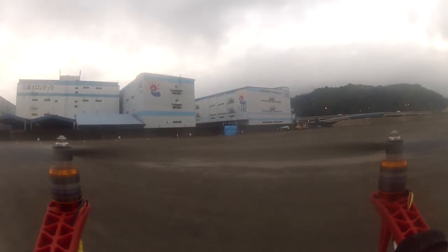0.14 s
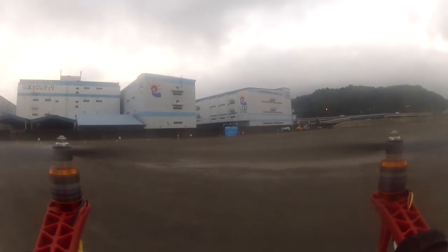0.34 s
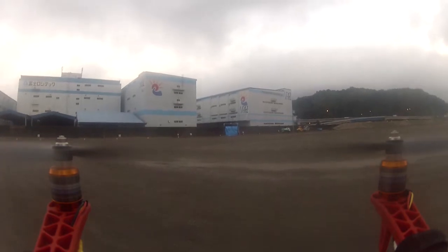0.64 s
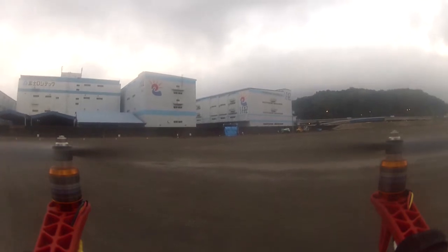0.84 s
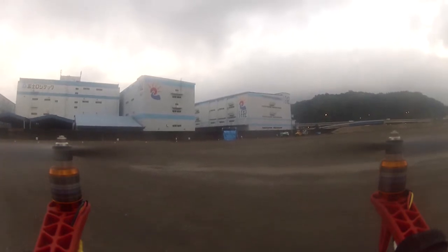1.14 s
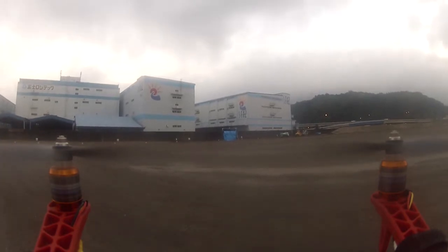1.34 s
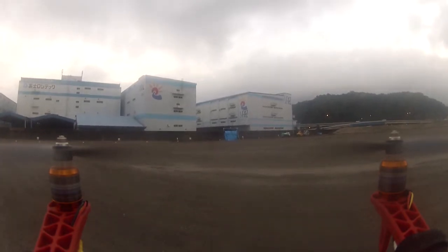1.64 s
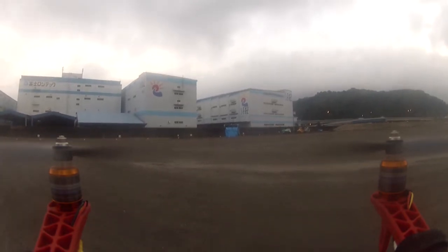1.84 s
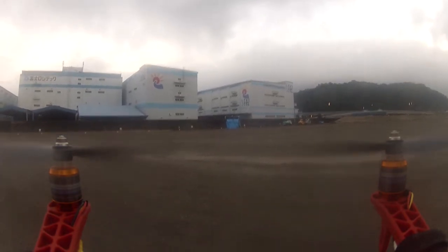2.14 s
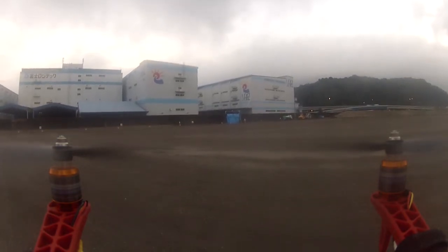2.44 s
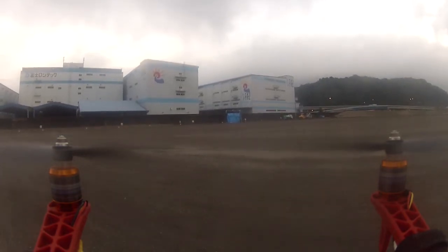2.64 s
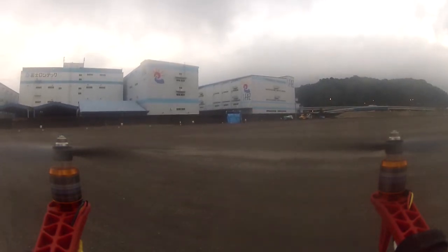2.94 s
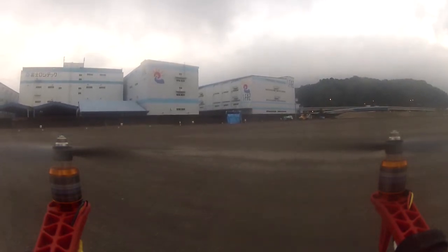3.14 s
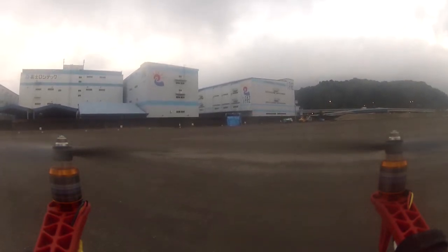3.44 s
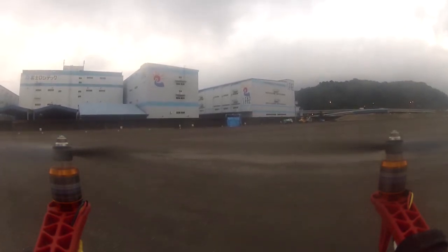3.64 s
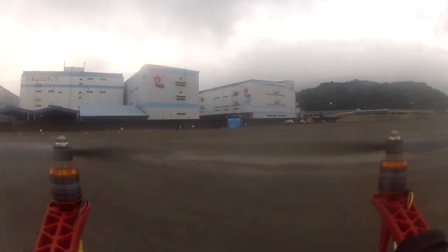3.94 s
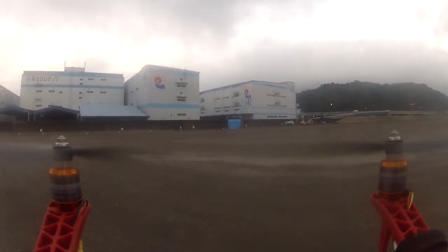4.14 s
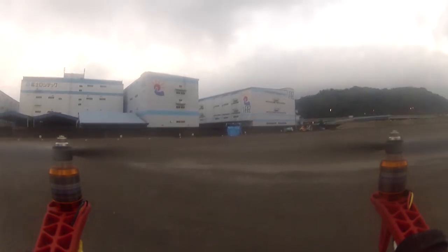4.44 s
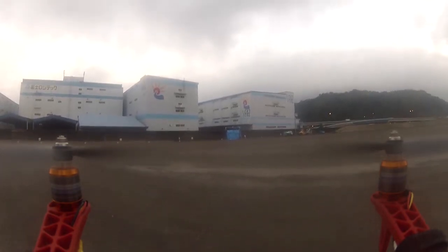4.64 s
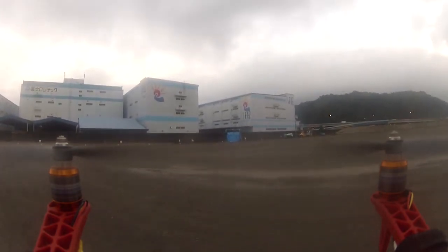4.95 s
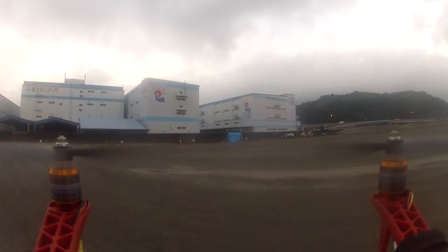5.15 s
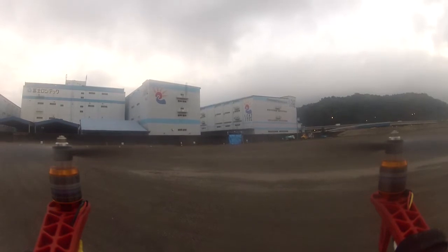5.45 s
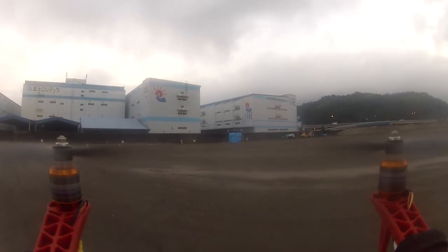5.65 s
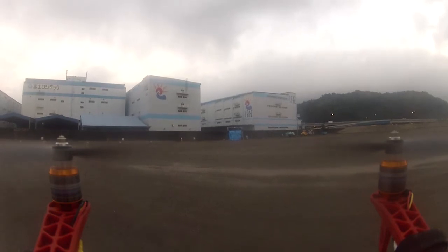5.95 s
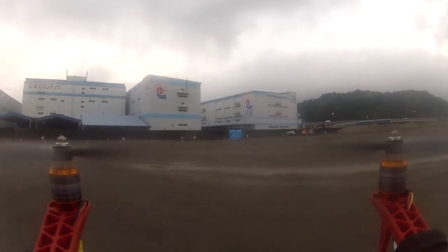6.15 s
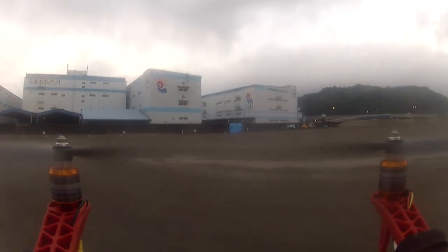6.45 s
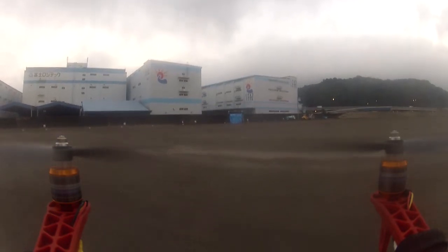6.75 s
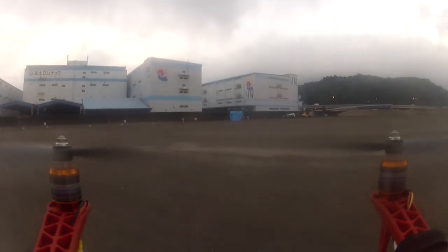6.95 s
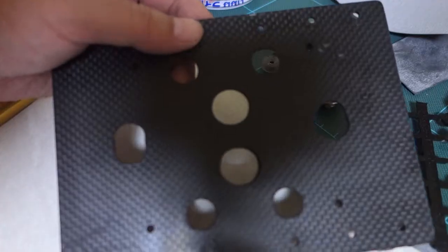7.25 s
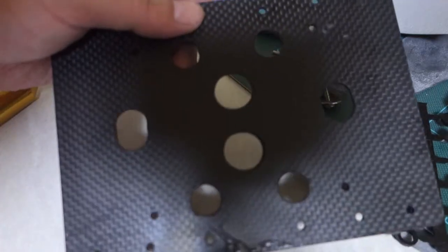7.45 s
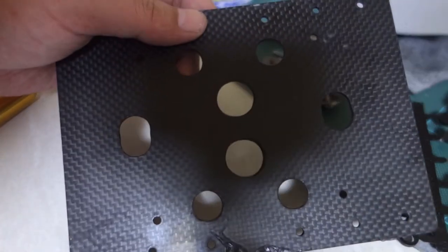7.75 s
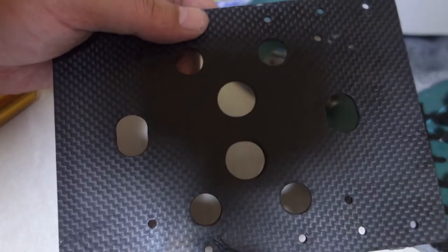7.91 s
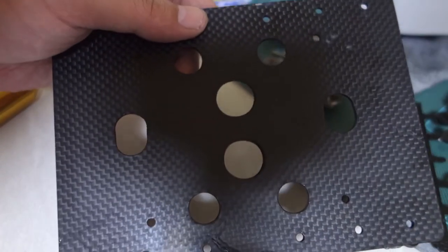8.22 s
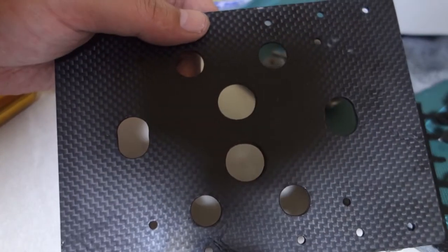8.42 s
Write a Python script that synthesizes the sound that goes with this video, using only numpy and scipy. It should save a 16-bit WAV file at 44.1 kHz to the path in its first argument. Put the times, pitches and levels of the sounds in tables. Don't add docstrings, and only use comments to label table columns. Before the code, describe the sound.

Several drone motors hover loudly right beside a boxed camera, their slightly different pitches beating into a rough, dense whine. Wavering whistles and rattling propeller turbulence sit on top, with brief jolts that surge and duck. At about seven seconds it stops instantly, and very quiet indoor ventilation fades in.

```python
import sys
import numpy as np
from scipy import signal
from scipy.fft import rfft, irfft
from scipy.io import wavfile

SR = 44100
rng = np.random.default_rng(int(sys.argv[2]) if len(sys.argv) > 2 else 0)


def voltage_ratio(level):
    return 10 ** (np.asarray(level, float) / 20)


def generate_wav(signal):
    frames = np.transpose(np.atleast_2d(signal))
    scaled = np.clip(frames, -1, 1) * 32767
    pcm = np.round(scaled).astype(np.int16)
    wavfile.write(sys.argv[1], SR, pcm)


N = 378378
HOLD_HZ = 12000
HELD = N * HOLD_HZ // SR + 64
CLOCK = np.arange(HELD) / HOLD_HZ


def curves(rows, clock):
    s, *columns = np.transpose(rows)
    return [np.interp(clock, s, column) for column in columns]


def drift(rate):
    steps_per_s = 100
    steps = rng.standard_normal(int(HELD / HOLD_HZ * steps_per_s) + 200)
    r = np.exp(-2 * np.pi * rate / steps_per_s)
    slow = signal.lfilter([1], [1, -2 * r, r * r], steps)[198:]
    return np.interp(CLOCK * steps_per_s, np.arange(len(slow)), slow / slow.std())


def hunted(hz):
    return hz * (1 + 0.0014 * drift(rate=5))


def tone(hz, level_db, flutter_db, blur):
    phase = 2 * np.pi * (np.cumsum(hz) / HOLD_HZ + rng.random())
    phase += blur * drift(rate=17.3)
    flutter = 0.71 * drift(rate=4.8) + 0.87 * drift(rate=40.0)
    return np.sqrt(2) * voltage_ratio(level_db + flutter_db * flutter) * np.sin(phase)


def coloured(x, spectrum, rate):
    hz = np.fft.rfftfreq(len(x), 1 / rate) + 1
    table_hz, table_db = np.transpose(spectrum)
    shape_db = np.interp(np.log(hz), np.log(table_hz), table_db)
    return irfft(rfft(x) * voltage_ratio(shape_db) * np.sqrt(rate / 2), len(x))


# [t/s, f/Hz (turns per second)]
SPEED_1 = [(0, 87.4), (.56, 87.0), (.76, 89.3), (1.46, 89.7), (1.63, 88.2), (1.85, 88.85), (2.02, 87.9),
           (2.52, 87.9), (2.8, 86.85), (3.1, 87.25), (3.96, 86.8), (4.25, 88.05), (4.85, 88.5),
           (5.28, 87.6), (5.95, 88.9), (6.24, 88.4), (6.7, 89.05), (7.06, 88.8)]
SPEED_2 = [(0, 94.55), (.36, 95.6), (.56, 94.8), (.72, 95.7), (1.1, 94.0), (1.7, 95.2), (2.3, 97.15),
           (2.8, 96.85), (3.0, 96.1), (3.36, 96.2), (3.52, 95.5), (3.84, 96.4), (4.25, 96.85),
           (4.62, 95.25), (5.5, 97.85), (6.26, 97.8), (6.5, 98.8), (7.06, 99.05)]
SPEED_3 = [(0, 97.3), (.15, 97.5), (.6, 99.6), (.8, 99.1), (1.22, 96.6), (1.7, 98.1), (2.1, 98.5),
           (2.32, 98.2), (2.55, 98.73), (3.1, 98.72), (3.4, 98.35), (3.62, 98.5), (4.14, 99.78),
           (4.72, 98.0), (5.38, 99.36), (6.12, 98.8), (6.38, 99.06), (7.06, 99.0)]
SPEED_4 = [(0, 89.6), (.24, 89.5), (.56, 88.15), (.86, 89.2), (1.24, 89.63), (1.44, 89.36), (1.72, 88.4),
           (2.14, 87.5), (2.38, 87.8), (2.7, 87.0), (3.0, 86.83), (3.5, 87.3), (3.94, 88.15), (4.14, 87.82),
           (4.44, 88.8), (4.8, 89.2), (5.24, 87.48), (7.06, 87.4)]
SPEED_5 = [(0, 105.65), (.46, 106.88), (1.1, 105.25), (1.56, 105.15), (2.04, 105.93), (2.76, 106.35),
           (3.05, 105.93), (3.52, 106.35), (3.95, 107.65), (4.2, 106.84), (4.45, 106.75), (4.7, 105.9),
           (5.05, 105.82), (5.4, 106.87), (5.85, 106.13), (6.28, 106.38), (6.62, 105.75), (7.06, 106.27)]


def shaft_speeds():
    tables = (SPEED_1, SPEED_2, SPEED_3, SPEED_4, SPEED_5)
    return [hunted(curves(rows, CLOCK)[0]) for rows in tables]


# [order (multiple of shaft speed), level/dB rms]
ORDERS_1 = [(1, -39.5), (2, -57.5), (3, -32.5), (4, -66), (5, -63), (6, -45.5), (8, -60.5), (9, -55.5),
            (10, -58), (11, -69), (12, -54.5), (14, -37), (20, -54), (24, -50), (25, -46), (28, -37),
            (29, -42), (42, -27.5), (43, -40.5)]
ORDERS_2 = [(1, -41), (2, -52.5), (3, -32), (4, -63.5), (5, -48), (6, -52.5), (8, -53.5), (11, -60),
            (13, -32), (14, -30.5), (21, -42), (24, -39), (28, -45), (29, -65), (35, -47), (36, -60),
            (39, -62), (42, -41.5), (49, -75)]
ORDERS_3 = [(1, -61.5), (6, -61), (8, -59.5), (9, -64.5), (10, -50), (12, -55), (13, -22), (14, -36.5),
            (15, -41.5), (16, -39), (17, -32.5), (18, -40.5), (20, -44), (21, -65), (25, -56), (26, -33.5),
            (27, -38), (33, -70), (34, -60), (37, -49), (38, -38), (40, -58), (42, -50.5), (43, -54)]
ORDERS_4 = [(3, -40.5), (9, -58), (12, -56), (13, -34), (14, -35), (15, -39), (16, -42), (19, -38.5),
            (20, -38.5), (23, -67), (28, -44), (31, -68), (42, -41)]
ORDERS_5 = [(13, -23.5), (14, -50.5)]
# [t/s, level/dB]
HUM_SWELL = [(0, -1), (.12, 4.5), (.53, -0.5), (.9, 0), (1.0, -5), (1.12, 1.5), (1.73, 4.5),
             (2.53, 0.5), (2.92, 3), (3.2, -1.5), (4.26, 4), (4.87, -3), (5.04, 2.5), (5.32, -4.5),
             (5.91, 3.5), (6.3, -1.5), (6.8, 4), (7.05, -0.5)]
HUM_SHARES = [
    1.26,
    0.43,
    .3,
    0,
    0,
]


def motors(shafts):
    out = np.zeros(HELD)
    hum_db = curves(HUM_SWELL, CLOCK)[0]
    magnet_db = 1.33 * drift(rate=1.9)
    all_orders = [ORDERS_1, ORDERS_2, ORDERS_3, ORDERS_4, ORDERS_5]
    for shaft, orders, share in zip(shafts, all_orders, HUM_SHARES):
        swell_db = {1: share * hum_db, 42: magnet_db}
        for order, level_db in orders:
            hz = order * shaft
            level_db = level_db + slope_db(hz) + swell_db.get(order, 0)
            out += tone(hz, level_db, flutter_db=1.27 + 0.012 * order, blur=0.014 * order)
    return out


# [f/Hz, width/Hz]
MOUNT_RESONANCES = [
    (278, 31.6),
    (462, 33),
    (600, 170),
    (800, 55),
    (1390, 300),
]


def slope_db(hz):
    edge_hz, hz_per_12_db = 3900, 150
    gain_db = -12 * np.maximum(hz - edge_hz, 0) / hz_per_12_db
    for centre, width in MOUNT_RESONANCES:
        if abs(hz.mean() / centre - 1) < 0.08:
            gain_db = gain_db - 20 * np.log10(1 + (2 * (hz - centre) / width) ** 2)
    return gain_db - np.median(gain_db)


# [t/s, f/Hz, level/dB]
LOW_WHISTLE = [(0, 2180, -42), (1.2, 2200, -44), (2.9, 2182, -38), (4.1, 2180, -40), (4.5, 2225, -37),
               (5.0, 2215, -48), (5.1, 2120, -40), (5.45, 2200, -35), (5.9, 2195, -33), (6.05, 2225, -34),
               (6.3, 2180, -35), (6.4, 2250, -30.5), (6.75, 2305, -28), (7.06, 2285, -33)]
MID_WHISTLE = [(0, 2440, -37), (.5, 2460, -29), (.9, 2465, -32.5), (1.3, 2487, -32), (1.55, 2435, -29.5),
               (1.7, 2445, -26), (2.05, 2425, -28), (2.25, 2388, -31), (2.85, 2376, -33),
               (3.399, 2418, -27.5), (4.0, 2438, -28), (4.32, 2425, -30.5), (4.52, 2470, -31),
               (5.04, 2455, -42), (5.5, 2480, -31), (6.72, 2470, -44)]
HIGH_WHISTLE = [(0, 2660, -35), (.7, 2673, -35), (1.15, 2610, -34), (1.44, 2633, -36), (2.16, 2610, -29),
                (2.88, 2596, -31), (3.12, 2614, -36), (3.7, 2648, -35), (4.079, 2627, -30),
                (4.56, 2695, -31), (5.28, 2600, -36), (6.3, 2626, -34.5), (6.72, 2570, -27.5)]


def controllers():
    out = 0
    for rows in (LOW_WHISTLE, MID_WHISTLE, HIGH_WHISTLE):
        hz, level_db = curves(rows, CLOCK)
        out = out + tone(hunted(hz), level_db, flutter_db=3.0, blur=0.27)
    return out


# [f/Hz,
# level/dB per Hz]
WASH_SPECTRUM = [(35, -84), (110, -90), (160, -71), (230, -73), (330, -90.5), (410, -85), (465, -68.5),
                 (530, -79.5), (640, -85), (740, -73.5), (860, -88.5), (1000, -71),
                 (1090, -68), (1250, -55.5), (1380, -57.5), (1450, -63.5), (1560, -63.5), (1700, -58),
                  (1850, -61), (2150, -61), (2550, -54), (2900, -68.5), (3300, -64.5), (3600, -63),
                  (3900, -59.5), (4200, -84.5)]
# [f/Hz, level/dB per Hz]
FILTER_LEAK = [
    (4600, -73.5),
    (5000, -82),
    (5250, -74.5),
    (5550, -77),
    (6000, -89),
]


def prop_wash(shafts):
    wash = 0
    for shaft in shafts:
        turn = 2 * np.pi * (np.cumsum(shaft) / HOLD_HZ + rng.random())
        pulse_db = 2.0 * np.sin(turn) + 1.7 * drift(rate=5.2)
        wash = wash + 0.51 * voltage_ratio(pulse_db) * rng.standard_normal(HELD)
    return coloured(wash, WASH_SPECTRUM + FILTER_LEAK, HOLD_HZ)


# [t/s, level/dB]
SLOW_LOAD = [
    (0, 0.1),
    (1.14, .8),
    (1.82, 0.74),
    (2.32, -0.26),
    (3.02, .8),
    (3.43, 0.14),
    (5.8, 0.25),
    (6.05, 0.5),
    (6.8, -1.4),
]
# [t/s, surge level/dB, duck level/dB]
JOLT_EVENTS = [(.28, 0, 3.5), (.51, 1, 3), (.75, -0.5, 1.5), (.95, -0.5, 4.5), (1.401, 0.5, 3),
               (1.50, .8, 4), (3.16, 1, 3), (3.441, 0, -1), (5.82, .1, 1), (5.97, -1.7, 1), (6.45, 2, 2.5),
               (6.9, 3, -0.5), (6.959, 4.5, 0.5)]


def shaking_db():
    surge_s, duck_s, recover_s = 0.049, 0.012, 0.05
    level_db = curves(SLOW_LOAD, CLOCK)[0]
    for s, surge_db, duck_db in JOLT_EVENTS:
        age = CLOCK - s
        ducked = np.clip(age / duck_s + 0.5, 0, 1)
        level_db += (1 - ducked) * surge_db * np.exp(np.minimum(age, 0) / surge_s)
        level_db -= ducked * duck_db * np.exp(-np.maximum(age, 0) / recover_s)
    cut_s, cut_db_per_s, remnant_db, remnant_s = 7.0615, 15700, -40, 0.014
    after = np.maximum(CLOCK - cut_s, 0)
    drop_db = -cut_db_per_s * after
    remnant_fall_db = remnant_db - cut_db_per_s * np.maximum(after - remnant_s, 0)
    return level_db + np.maximum(drop_db, remnant_fall_db)


def sample_and_hold(flight):
    held = signal.resample_poly(np.repeat(flight, 4), 147, 160)[:N]
    held = signal.sosfilt(signal.butter(1, 13700, fs=SR, output="sos"), held)
    return signal.sosfiltfilt(signal.ellip(12, 0.2, 50, 15330, fs=SR, output="sos"), held)


def starve(x):
    from_hz, to_hz, band_hz, threshold_db = 11040, 13000, 190, -75.5
    hz, s, spectra = signal.stft(x, SR, nperseg=2048)
    shared_db = threshold_db + 2.2 * np.repeat(rng.standard_normal(len(s)), 2)[:len(s)]
    for low in np.arange(from_hz, to_hz, band_hz):
        band = (hz >= low) & (hz < low + band_hz)
        level_db = 20 * np.log10(np.abs(spectra[band]).max(axis=0) + 1e-12)
        grain = rng.standard_normal((2, band.sum(), len(s))) * voltage_ratio(level_db - 11)
        limit_db = shared_db + 1.5 * rng.standard_normal(len(s))
        grainy = spectra[band] + grain[0] + 1j * grain[1]
        spectra[band] = grainy * (level_db > limit_db)
    return signal.istft(spectra, SR, nperseg=2048)[1][:N]


# [f/Hz, level/dB per Hz]
ROOM_AIR = [(15, -47), (25, -19), (96, -10.5), (144, -15), (221, -8.5), (306, -5.5), (341, -8),
            (484, -12.5), (633, -12.5), (1180, -18.5), (5170, -41), (6080, -39.5), (15600, -52.5)]
# [f/Hz, width/Hz, level/dB]
ROOM_RESONANCES = [
    (90.7, 8, 6),
    (172, 6.3, 7),
    (209, 6.1, 11.5),
    (242, 6.2, 9),
    (790, 8.4, 7),
    (2040, 200, 5),
]
# [f/Hz, level/dB rms]
MECHANISM_WHINE = [(4500, -82), (4646, -89), (5663, -85), (5809, -80), (5954, -78), (6099, -81),
                   (6245, -85), (6390, -90), (6826, -86), (6971, -89), (7117, -88), (7407, -92)]


def room():
    clock = np.arange(N) / SR
    air = coloured(rng.standard_normal(N), ROOM_AIR, SR)
    for hz, width, db in ROOM_RESONANCES:
        air = air + (voltage_ratio(db) - 1) * signal.lfilter(*signal.iirpeak(hz, hz / width, SR), air)
    whine = 0
    for hz, db in MECHANISM_WHINE:
        whine = whine + voltage_ratio(db + 48.5) * np.sin(2 * np.pi * (hz * clock + rng.random()))
    start_s, fade_s, room_db = 7.078, 0.2, -41.5
    fade = np.clip((clock - start_s) / fade_s, 0, 1) ** 0.58
    return voltage_ratio(room_db) * fade * (air / air.std() + whine)


def scene():
    shafts = shaft_speeds()
    flight = motors(shafts) + controllers() + prop_wash(shafts)
    held = sample_and_hold(flight * voltage_ratio(shaking_db()))
    return (starve(held) + room())[None]


def band_limit(x):
    return signal.sosfilt(signal.butter(12, 15750, fs=SR, output="sos"), x)


def record(dry):
    return band_limit(dry)


dry = scene()
out = record(dry)
generate_wav(out)
```